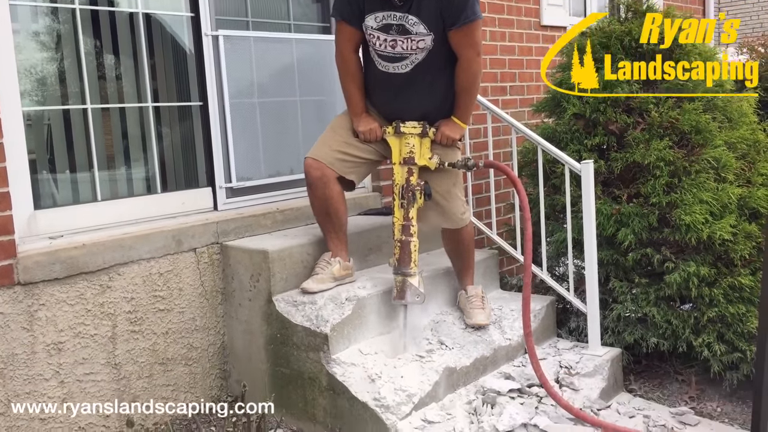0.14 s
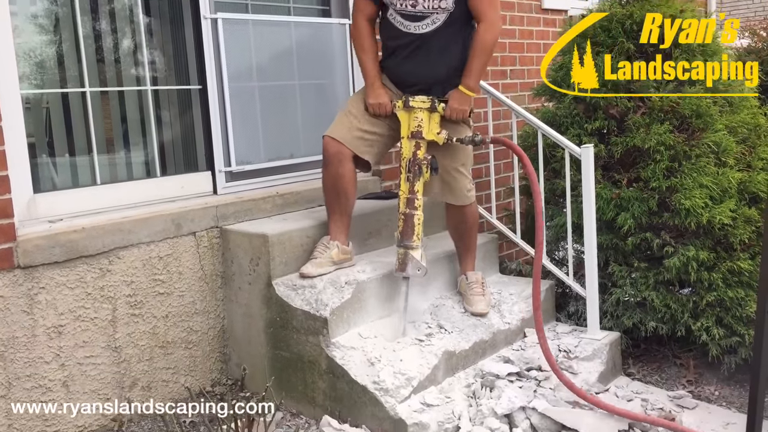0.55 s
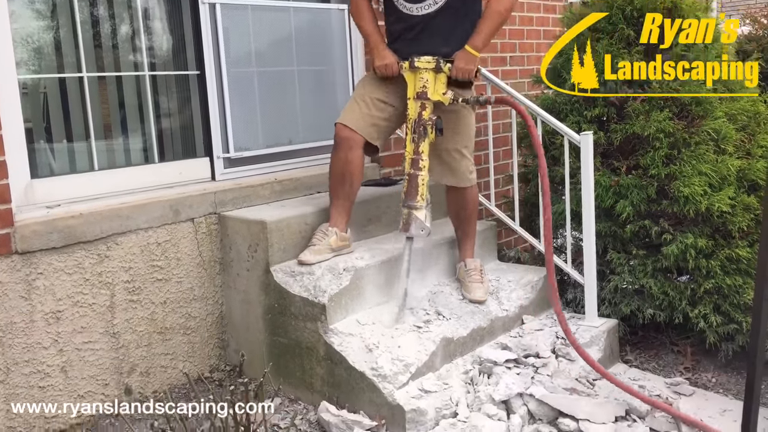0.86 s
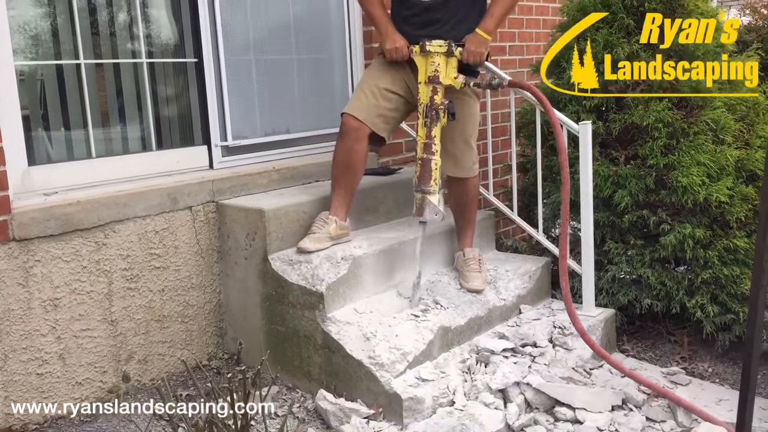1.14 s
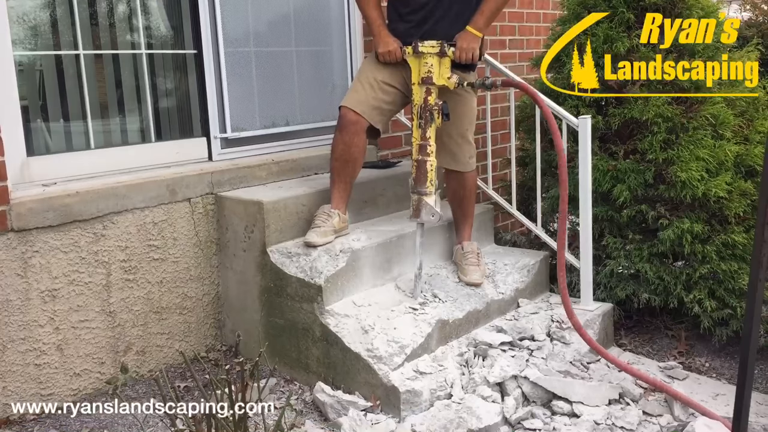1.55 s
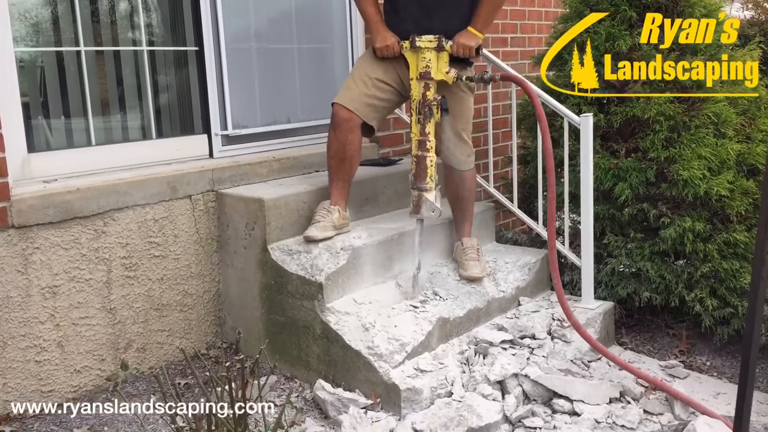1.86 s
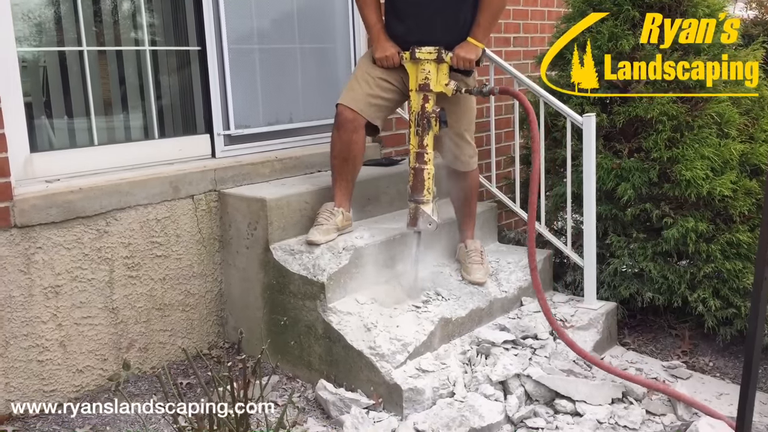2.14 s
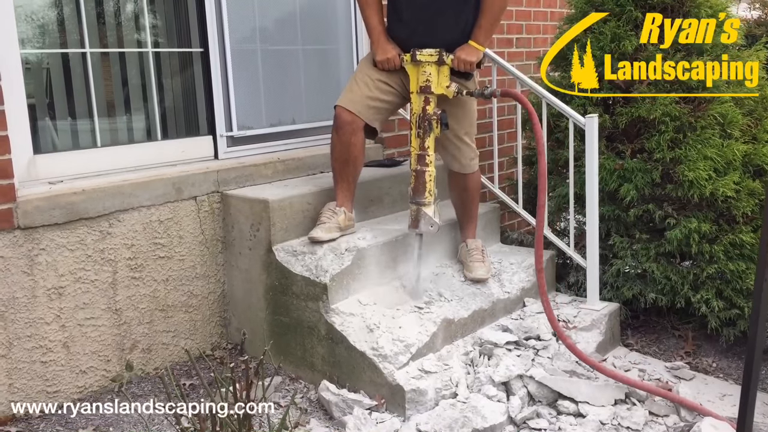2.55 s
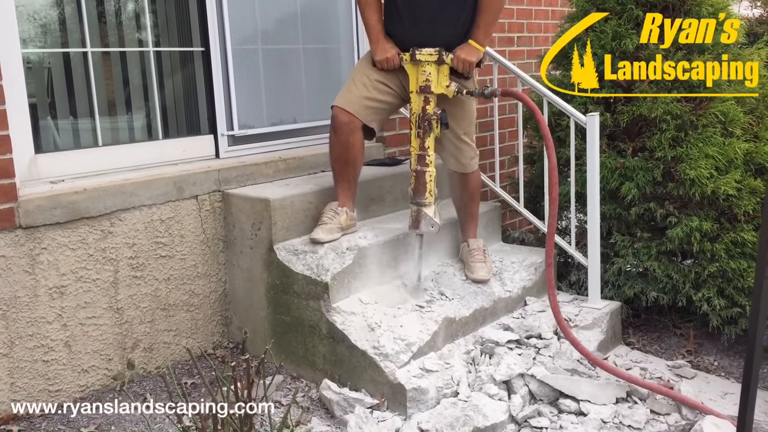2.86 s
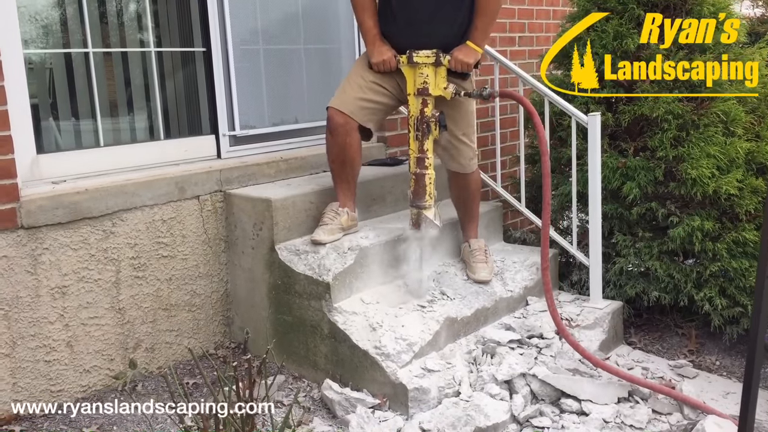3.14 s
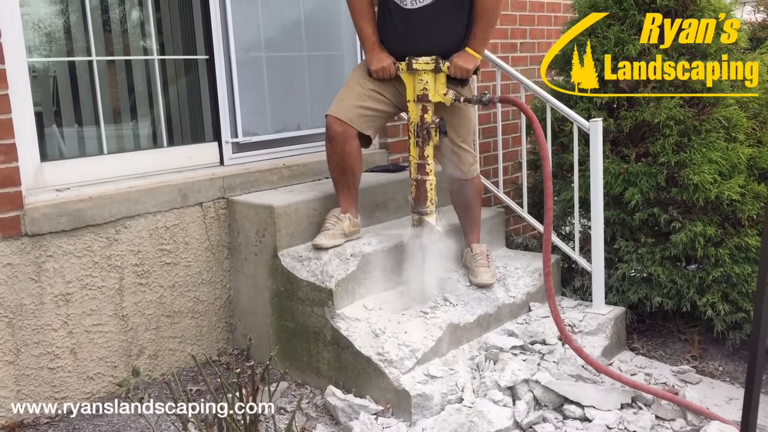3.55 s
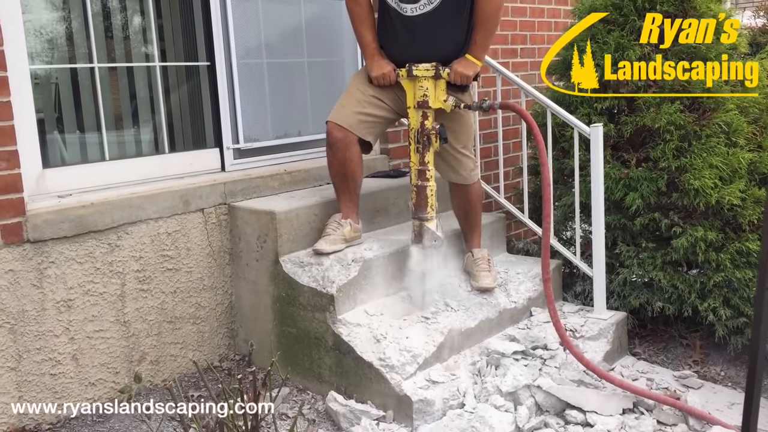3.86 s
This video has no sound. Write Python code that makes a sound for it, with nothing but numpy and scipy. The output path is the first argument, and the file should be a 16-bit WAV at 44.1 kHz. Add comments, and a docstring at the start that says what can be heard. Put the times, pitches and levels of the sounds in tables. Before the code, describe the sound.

A pneumatic jackhammer rattles loudly on concrete, rests amid engine hum and knocks, then restarts

```python
"""A pneumatic jackhammer breaks concrete steps beside a house wall, rests for over a second, restarts.
Each stroke: a valve puff (decaying air modes), a blast pulse with the noise crack of steel on concrete,
a ringing chisel and housing (damped modes), an intake puff and a return puff.
In the rest an automatic gain creeps up on a diesel compressor (firing orders, throbbing fan noise);
chisel and chips tap the concrete, and air squeals past the valve, then leaks from the trigger."""
import sys
import numpy as np
from scipy import signal
from scipy.io import wavfile
from scipy.ndimage import uniform_filter1d

SR = 44100
rng = np.random.default_rng(int(sys.argv[2]) if len(sys.argv) > 2 else 0)


def unload_wav(signal):
    """Save mono or channel-first audio to the path in sys.argv[1] as 16-bit WAV at rate SR, clipped to [-1, 1]."""
    wavfile.write(
        sys.argv[1],
        SR,
        np.round(np.clip(np.atleast_2d(signal).T, -1, 1) * 32767).astype(np.int16),
    )


N = 176400
T = np.arange(round(0.25 * SR)) / SR  # time axis of one event, s

# noise spectrum of steel on concrete: (f/Hz, relative density/dB per Hz)
CRACK_SPECTRUM = [(200, -5.5), (700, -4), (1400, -2.5), (1700, 0), (2900, 5), (4200, 0), (5200, -7),
                  (6900, -2), (8300, -12), (10500, -15.5), (13000, -7.5), (16000, -13.5)]
# noise spectrum of valve and intake air: (f/Hz, relative density/dB per Hz)
HISS_SPECTRUM = [(200, -11.5), (700, 7), (1300, -1), (2100, -18.5), (3000, 0), (4000, -7.5), (5200, -13.5),
                 (10000, -17.5), (16000, -4)]
VALVE_HISS_DB, HISS_DECAY_S = -18, 0.01


def amp(db):
    """Decibels to gain."""
    return 10 ** (np.asarray(db) / 20)


def read(points, hz):
    """Table read on a log-frequency axis."""
    f, value = np.transpose(points)
    return np.interp(np.log(hz + 1), np.log(f), value)


def over_time(points, **ends):
    """Table of values over time, interpolated to every sample."""
    return np.interp(np.arange(N) / SR, *np.transpose(points), **ends)


def add(mix, s, sound):
    """Lays a sound into the mix at time s, cut at the mix edges."""
    at = round(s * SR)
    sound = sound[max(-at, 0):]
    part = mix[max(at, 0):][:len(sound)]
    part += sound[:len(part)]


def colour(x, points):
    """Causal minimum-phase filter of unit energy with the given spectrum."""
    hz = abs(np.fft.fftfreq(4096, 1 / SR))
    log_gain = np.log(amp(read(points, hz)))
    response = np.exp(np.conj(signal.hilbert(log_gain)))
    taps = np.fft.ifft(response).real[:2048]
    return signal.oaconvolve(x, taps / np.linalg.norm(taps))[:len(x)]


def ring(modes, rise_cycles):
    """Exponentially dying modes; build-up time constant in cycles over 1 s of phase (rise_cycles / f)."""
    out = np.zeros(len(T))
    for hz, db, t60 in modes:
        rise = 1 - np.exp(-T * hz / rise_cycles)
        out += amp(db - 60 * T / t60) * rise * np.cos(2 * np.pi * hz * T)
    return out


def burst(decay_s):
    """Puff of white noise that dies away exponentially."""
    return rng.standard_normal(len(T)) * np.exp(-T / decay_s)


def low_cut(x):
    """Fourth-order high-pass at 60 Hz."""
    return signal.sosfilt(signal.butter(4, 60, "high", fs=SR, output="sos"), x)


def compressor():
    """Diesel: harmonics of a slowly changing rate, and fan noise throbbing at the second order."""
    # second firing order: (t/s, f/Hz)
    second_order_hz = [(0.8, 98.4), (1.9, 100.3)]
    # harmonic hum: (firing order, level/dB)
    orders = [(1, -52), (2, -51), (3, -72.5), (4, -81), (5, -81), (6, -72)]
    # fan noise: (f/Hz, relative density/dB per Hz)
    fan_spectrum = [(76, -49), (130, -8), (257, -8), (333, -19.5), (507, -12.5), (905, -13), (1220, -4),
                    (1750, -5.5), (3530, -20), (8510, -24), (15500, -26.5)]
    # slow swell and dip of level on the compressor: (t/s, level/dB)
    drift_points = [(.7, 1.5), (1.099, 1), (1.45, 3.5), (1.7, -1.5), (1.9, -1)]
    fan_db, throb_depth = -54.5, 0.17
    turns = np.cumsum(over_time(second_order_hz) / 2) / SR  # cycles of order 1
    hum = sum(amp(db) * np.cos(2 * np.pi * round(k) * turns) for k, db in orders)
    throb = 1 + throb_depth * np.cos(4 * np.pi * turns)
    clatter = rng.standard_normal(N) * throb
    return amp(over_time(drift_points)) * (hum + amp(fan_db) * colour(clatter, fan_spectrum))


def leak():
    """Short hiss of coloured noise: air leaks from the trigger just before the restart."""
    # leak envelope: (t/s, level/dB)
    envelope = [(1.88, -95), (1.9, -46), (1.92, -53), (1.94, -90)]
    # leak noise: (f/Hz, relative density/dB per Hz)
    spectrum = [(300, 1.5), (1500, 5.5), (3800, -8.5), (5500, -5), (8000, -12), (15000, -7.5)]
    level_db = over_time(envelope, left=-120, right=-120)
    return amp(level_db) * colour(rng.standard_normal(N), spectrum)


def squeal():
    """Air squeals past the closing valve: a sine whose frequency wavers with smoothed noise."""
    # squeal envelope: (t/s, level/dB)
    envelope = [(.58, -98), (.64, -29.5), (.705, -49), (0.733, -34.5), (.82, -53), (.86, -37), (.93, -61),
                (.98, -49), (1.04, -70), (1.15, -84)]
    centre_hz, waver_hz = 12030, 450  # waver_hz scales noise of about 0.1 rms
    waver = uniform_filter1d(rng.standard_normal(N), size=100)
    cycles = np.cumsum(centre_hz + waver_hz * waver) / SR
    return amp(over_time(envelope, left=-120, right=-120)) * np.sin(2 * np.pi * cycles)


def knocks():
    """Loose chisel and chips tap the concrete: a grit burst and short damped modes per tap."""
    # taps: (t/s, relative level/dB, steel re tap/dB)
    taps = [(0.761, -13.5, -2), (1.034, -13.5, 0), (1.115, -11.5, -19), (1.355, -17.5, -1),
            (1.5465, -4, 5.5), (1.618, 4, 1), (1.666, -13, -3), (1.692, -21, 7)]
    # tap modes: (f/Hz, relative level/dB, t60/s)
    modes = [(178, -18.5, .12), (624, -15, .05), (945, -5.5, 0.033), (1470, -7, 0.04), (2430, -10, 0.059),
             (3960, -4, 0.032), (4390, -6, 0.051), (6860, -8, 0.031), (11700, -33, 0.28)]
    # grit noise: (f/Hz, relative density/dB per Hz)
    grit_spectrum = [(150, 3.5), (400, -17), (900, -2), (2500, 7), (4400, -3.5), (6800, -8), (10000, -13.5),
                     (16000, -30)]
    knock_db, decay_s, rise_s = -29.5, 0.0074, 0.00027
    grit, steel = np.zeros((2, N))
    for s, db, ring_db in taps:
        add(grit, s, amp(db) * burst(decay_s) * (1 - np.exp(-T / rise_s)))
        add(steel, s, amp(db + ring_db) * ring(modes, rise_cycles=1.5))
    return amp(knock_db) * (colour(grit, grit_spectrum) + steel)


def strokes():
    """Per blow: time, force, crack/dB, clank/dB, stroke/s, slack/s; slower strokes hit harder."""
    # blows: (t/s, relative blast/dB, relative concrete crack/dB, relative housing clank/dB)
    blows = [(-0.021, 0, 10.5, -8), (0.0234, -1.5, 1.5, -10.5), (0.0685, 0, 4, -9), (0.115, -0.5, 2, -12.5),
             (0.1601, -1.5, 4, -15), (0.2041, -0.5, 1.5, -12), (0.2471, -0.5, 2, -6.5),
             (0.2908, 0.5, 0.5, -6.5), (0.3326, 0, 1.5, -8), (0.3762, -0.5, 5, -4), (0.4223, -0.5, 2, -10),
             (0.4699, 0, 5, -3), (0.5165, 1.5, 0, -13), (0.5694, -3.5, 2, -13), (1.9315, -11.5, -2.5, -34),
             (1.961, 2.5, 2, -20), (2.017, 6.5, 0.5, -3), (2.0699, 6.5, -1, -6), (2.12, 2, 0, -14),
             (2.1735, 1, -1, -29), (2.2302, 1, -1, -23), (2.2859, 2, -1.5, -18), (2.3417, 2.5, 0, -15),
             (2.3974, 1.5, 0, -11), (2.4522, 1.5, -1.5, -12), (2.5082, 1, -1, -16), (2.5636, 0.5, 0, -22),
             (2.6181, 0.5, 1, -24), (2.6715, 1.5, -1.5, -13), (2.7222, 1, 0, -30), (2.7716, 1, 0, -24),
             (2.8214, 1.5, -2, -28), (2.8704, 1, -1, -17), (2.9179, -0.5, 3.5, -18), (2.968, -1, 3, -30),
             (3.0158, 0, 3.5, -15), (3.0645, 0, -0.5, -21), (3.1101, -0.5, -2.5, -22),
             (3.1553, -0.5, -0.5, -13), (3.2038, -1.5, 2, -16), (3.2514, -1, 2.5, -9),
             (3.2988, -1.5, 0, -13), (3.3485, -1.5, 1, -19), (3.3961, -2, 0, -14), (3.4426, -2, -0.5, -17),
             (3.4859, -2, -0.5, -14), (3.5303, -1, 0.5, -30), (3.575, -1, -2, -17), (3.6192, -0.5, 0, -24),
             (3.6637, 0, -1, -20), (3.7074, -1.5, 1, -21), (3.752, -0.5, -2.5, -14), (3.7967, -2, 1.5, -21),
             (3.842, -1.5, -1, -15), (3.8863, -1.5, 1, -18), (3.9305, -1.5, -1, -17),
             (3.9752, -0.5, -1.5, -19)]
    longest_s, force_db_per_s = 0.055, 157
    gaps = np.diff([row[0] for row in blows])
    lengths = np.minimum(np.append(gaps, gaps[-1]), longest_s)
    slacks = lengths - np.median(lengths)
    rows = []
    for (s, blast_db, crack_db, clank_db), stroke, slack in zip(blows, lengths, slacks):
        force = amp(blast_db + force_db_per_s * max(slack, 0))
        rows.append((s, force, crack_db, clank_db, stroke, slack))
    return rows


def pressure_pulse():
    """Single air pulse: a trough, then a rebound of opposite sign."""
    u = T / 0.00031
    return -2 * (1 - u) * np.exp(-u) * (1 - np.exp(-u / 0.5))


def reflect(pulses):
    """Pulses with their early echoes from ground and wall."""
    # reflections: (delay/s, linear gain)
    echoes = [(.0023, 0.34), (.0039, 0.32), (.0068, .2)]
    out = pulses.copy()
    for delay, gain in echoes:
        add(out, delay, gain * pulses)
    return out


def valve_puffs(blows):
    """Air modes of the valve chest and a hiss, before each blow and alone as the trigger moves."""
    # air in the valve chest: (f/Hz, relative level/dB, t60/s)
    chest_modes = [(518.3, -12, 0.068), (822, -33.5, 0.06), (1120, -6.5, 0.0067), (1500, -49, 0.011),
                   (2720, -21, 0.027), (3120, -38, .009)]
    # puffs with no blow, trigger let go or pressed: (t/s, relative level/dB)
    idle_puffs = [(.587, 4.5), (0.624, -4), (0.6703, -9), (1.919, -13)]
    lead_s = 0.0052
    air, hiss = np.zeros((2, N))
    puff = ring(chest_modes, rise_cycles=0.53)
    same_hiss = burst(HISS_DECAY_S)  # half of the hiss power repeats in every stroke
    for s, force, *_ in blows:
        add(air, s - lead_s, force * puff)
        mixed = (same_hiss + burst(HISS_DECAY_S)) / np.sqrt(2)
        add(hiss, s - lead_s, force * amp(VALVE_HISS_DB) * mixed)
    for s, db in idle_puffs:
        add(air, s, amp(db) * puff)
        add(hiss, s, amp(db + VALVE_HISS_DB - 1.5) * burst(HISS_DECAY_S))
    return low_cut(air) + colour(hiss, HISS_SPECTRUM)


def intake_puffs(blows):
    """Air drawn back behind the piston, partway through the stroke: modes and a hiss."""
    # intake air: (f/Hz, relative level/dB, t60/s)
    modes = [(67, -41, 0.027), (199.4, -23.5, 0.17), (359, -19, 0.021), (508, -6.5, 0.013),
             (805, -21, 0.058), (1040, -19, 0.023), (1460, -11, 0.0099)]
    stroke_share, jitter_s, hiss_db = 0.38, 0.00036, -20.5
    air, hiss = np.zeros((2, N))
    puff = ring(modes, rise_cycles=0.23)
    for s, force, _, _, stroke, _ in blows:
        drawn = s + stroke_share * stroke + jitter_s * rng.standard_normal()
        add(air, drawn, force * puff)
        add(hiss, drawn, force * amp(hiss_db) * burst(0.0097))
    return low_cut(air) + colour(hiss, HISS_SPECTRUM)


def return_puffs(blows):
    """Rebound before the next blow: noise and a pressure pulse, stronger after slower strokes."""
    lead_s, rebound_db, rebound_db_per_s = 0.0275, -19, 800
    noise, pulses = np.zeros((2, N))
    pulse = pressure_pulse()
    for s, force, _, _, stroke, slack in blows:
        rebound = force * amp(rebound_db + rebound_db_per_s * slack)
        at = s + stroke - lead_s
        add(noise, at, rebound * burst(0.0054))
        add(pulses, at, 7.1 * rebound * pulse)
    return low_cut(reflect(pulses)) + colour(noise, CRACK_SPECTRUM)


def clank(blows):
    """Housing modes, slightly detuned at random each blow."""
    # housing: (nominal f/Hz, relative level/dB, t60/s)
    housing = [(2343, -7, 0.057), (2472, -5, 0.066), (2600, -13, 0.045)]
    lag_s, detune = 0.001096, 0.036
    out = np.zeros(N)
    for s, _, _, clank_db, *_ in blows:
        modes = [(hz * (1 + detune * rng.standard_normal()), db, t60) for hz, db, t60 in housing]
        add(out, s + lag_s, amp(clank_db + 5) * ring(modes, rise_cycles=3.5))
    return out


def chisel(s):
    """Steel rings up unevenly after the blow and is damped when the piston lifts."""
    # steel modes: (f/Hz, relative level/dB, t60/s, family: 0 low, 1 middle, 2 high, 3 top)
    modes = [(3212, -3, .08, 0), (3738, 4, .09, 0), (3870, -3, .06, 0), (4745, 5, .2, 1),
             (5464, -3, .15, 1), (6250, -7, .07, 1), (6890, -5, .07, 1), (7388, -11, .15, 2),
             (9503, 3, .3, 2), (11733, -6, .2, 3), (13792, -4, .2, 3), (14127, -3, .2, 3)]
    # ring as the hole grips the chisel: (t/s, low/dB, middle/dB, high/dB, top/dB), all relative
    grip = [(.02, -14.5, -46, -23.5, -19), (.15, -13, -47, -24, -19), (.29, -24, -56, -35, -29),
            (.42, -14, -38, -23, -22.5), (.52, -7, -32.5, -25, -23), (0.571, -35, -31, -38, -34),
            (2.02, -21, -26, -34.5, -33), (2.172, -29, -29, -35, -36), (2.38, -21, -23, -32.5, -27),
            (2.558, -28, -24, -32, -28), (2.87, -34, -24.5, -24.5, -18.5), (3.099, -29, -28.5, -22, -22),
            (3.33, -22, -32, -17, -15.5), (3.5, -22.5, -36, -14.5, -20), (4, -28, -29, -14, -21.5)]
    ring_db, flutter_depth, rise_s = 2, 0.73, 0.0066
    hold_s, stop_s, left_gain, left_s = 0.025, 0.005, 0.28, 0.036
    when, *families = np.transpose(grip)
    out = np.zeros(len(T))
    for hz, db, t60, family in modes:
        noise = rng.standard_normal((2, len(T)))
        flutter = uniform_filter1d(noise, size=256, mode="wrap") * np.sqrt(256)
        sway = 1 + flutter_depth * (flutter[0] + 1j * flutter[1])
        sway /= np.sqrt(abs(sway))  # halves the swing in dB
        level_db = np.interp(s, when, families[round(family)]) + db + ring_db
        carrier = np.exp(2j * np.pi * (hz * T + rng.random()))
        out += amp(level_db - 60 * T / t60) * (sway * carrier).real
    stopped = np.exp(-np.maximum(T - hold_s, 0) / stop_s)
    damped = stopped + left_gain * np.exp(-T / left_s)
    return out * (1 - np.exp(-(T / rise_s) ** 2)) * damped


def chisel_ring(blows):
    """Chisel ring of every blow, scaled by its force."""
    out = np.zeros(N)
    for s, force, *_ in blows:
        add(out, s, force * chisel(s))
    return out


def concrete_crack(blows):
    """Noise of steel on concrete: a first crack, then a lagging crack with longer grit."""
    crack_level_db, decay_s = -14.5, 0.0032
    lag_s, steel_db, grit_db, grit_decay_s = 0.0025, -5, -17, 0.017
    noise = np.zeros(N)
    same_crack = burst(decay_s)  # half of the first crack's power repeats in every blow
    for s, force, crack_db, *_ in blows:
        first = (same_crack + burst(decay_s)) / np.sqrt(2)
        add(noise, s, force * amp(crack_level_db + crack_db) * first)
        late = amp(steel_db) * burst(decay_s) + amp(grit_db) * burst(grit_decay_s)
        add(noise, s + lag_s, force * amp(crack_db) * late)
    return colour(noise, CRACK_SPECTRUM)


def exhaust_blast(blows):
    """Pressure pulse with early echoes, and the modes of exhaust and casing."""
    # exhaust and casing: (f/Hz, relative level/dB, t60/s)
    body_modes = [(75.3, -16, 0.088), (100.6, -18.5, 0.14), (140.2, -18.5, 0.16), (202.5, -18, 0.13),
                  (343, -10.5, 0.063), (521, -10.5, 0.033), (795, -19, 0.077), (980.7, -14, 0.073),
                  (1034, -13.5, 0.06), (1370, -15.5, 0.051)]
    blast_db = -8.5
    air, pulses = np.zeros((2, N))
    pulse, body = pressure_pulse(), ring(body_modes, rise_cycles=0.12)
    for s, force, *_ in blows:
        add(pulses, s, force * amp(blast_db) * pulse)
        add(air, s, force * body)
    return low_cut(air + reflect(pulses))


def hammer():
    """All mechanisms of the tool, driven by one list of strokes."""
    blows = strokes()
    puffs = valve_puffs(blows) + intake_puffs(blows) + return_puffs(blows)
    steel = clank(blows) + chisel_ring(blows)
    return puffs + steel + concrete_crack(blows) + exhaust_blast(blows)


def yard(x):
    """Short scattered tail from house front and shrubs: noise with frequency-dependent decay."""
    # tail decay: (f/Hz, t60/s)
    decay = [(60, 0.43), (500, 0.27), (3000, .17), (16000, 0.33)]
    hz, t, z = signal.stft(rng.standard_normal(SR // 2), SR, nperseg=256)
    z = z * amp(-60 * t / read(decay, hz)[:, None])
    tail = signal.istft(z, SR, nperseg=256)[1]
    tail *= 1 - np.exp(-np.arange(len(tail)) / SR / 0.005)
    return signal.fftconvolve(x, tail / np.linalg.norm(tail))[:N]


def scene():
    """Tool in its yard, compressor behind."""
    yard_db = -14
    tool = hammer() + knocks()
    return (tool + amp(yard_db) * yard(tool) + squeal() + leak() + compressor())[None]


def record(dry):
    """Gain control that drops fast and creeps back, overload, then the band limit."""
    max_gain_db, target_db, recover_db_per_s, attack_s = 20.5, -11, 21, 0.037
    edge_hz, hop = 15900, 88  # hop: samples per gain step
    power = abs(uniform_filter1d(dry[0] ** 2, size=440))
    level_db = 10 * np.log10(power + 1e-12)[::hop]
    gain_db, track = 0, []
    for wanted_db in np.minimum(target_db - level_db, max_gain_db):
        gain_db += min((wanted_db - gain_db) / attack_s, recover_db_per_s) * hop / SR
        track.append(gain_db)
    loud = dry * amp(np.interp(np.arange(N), np.arange(len(track)) * hop, track))
    clipped = loud / (1 + loud ** 8) ** (1 / 8)
    band = signal.firwin(401, edge_hz, window=("kaiser", 8), fs=SR)
    return signal.oaconvolve(clipped, band[None], "same")


dry = scene()
out = record(dry)
unload_wav(out)
```